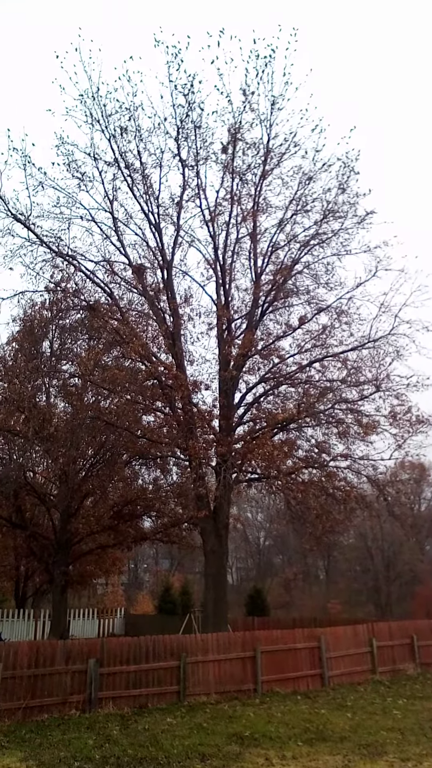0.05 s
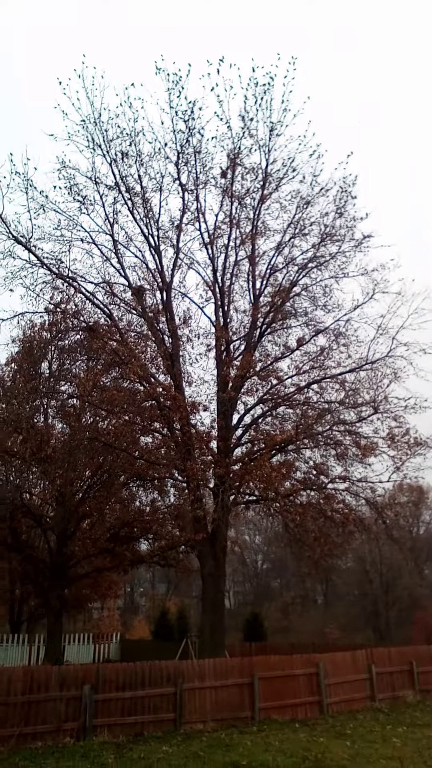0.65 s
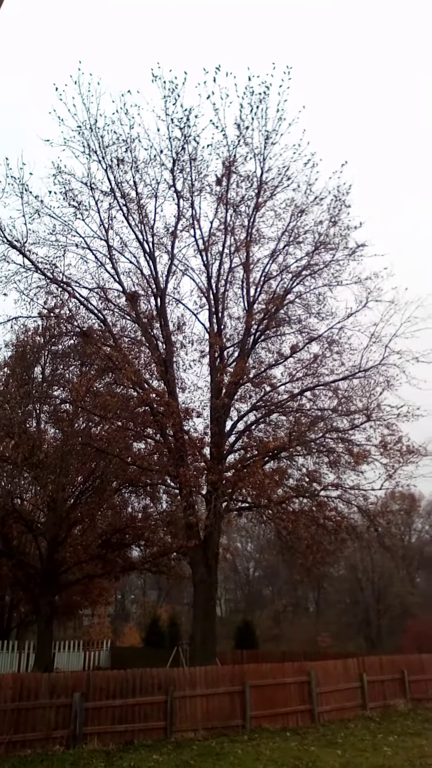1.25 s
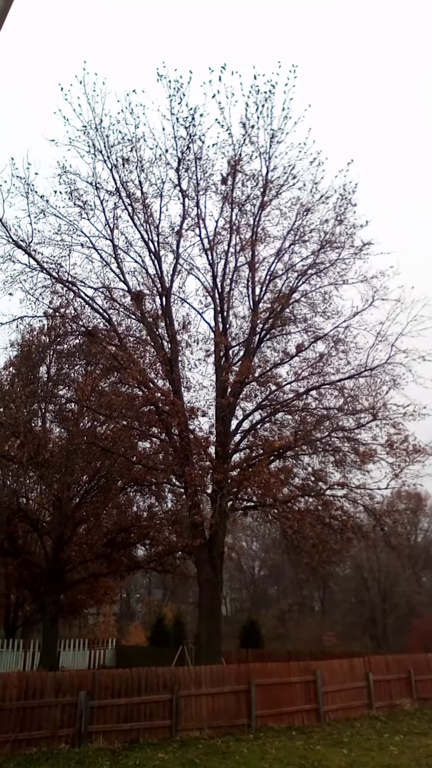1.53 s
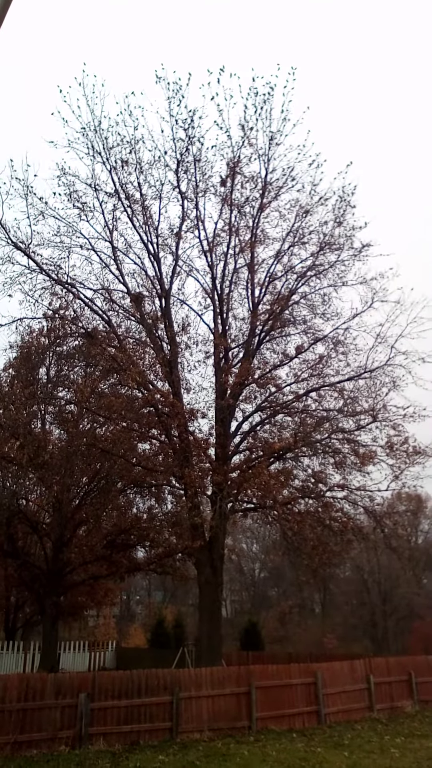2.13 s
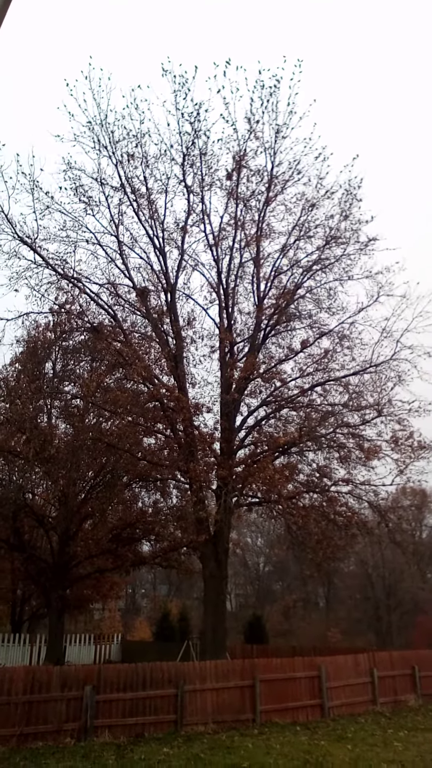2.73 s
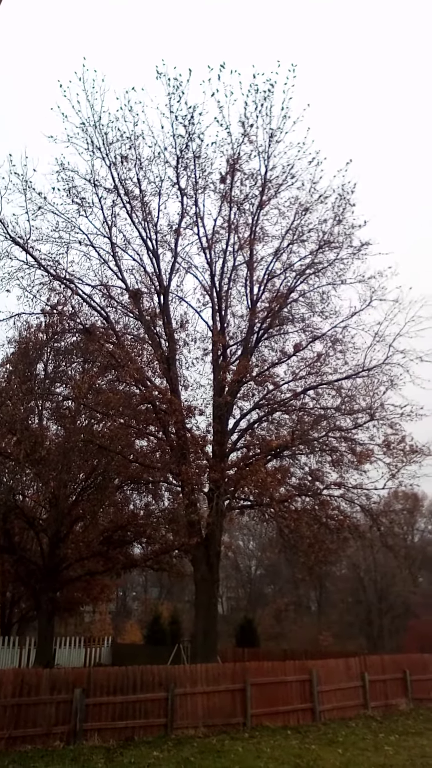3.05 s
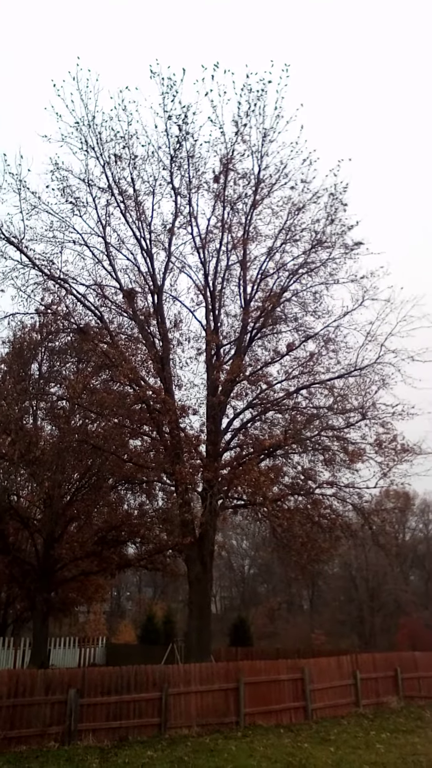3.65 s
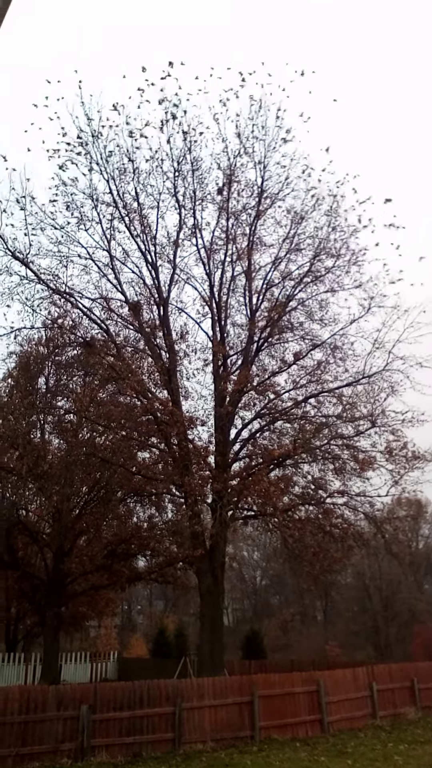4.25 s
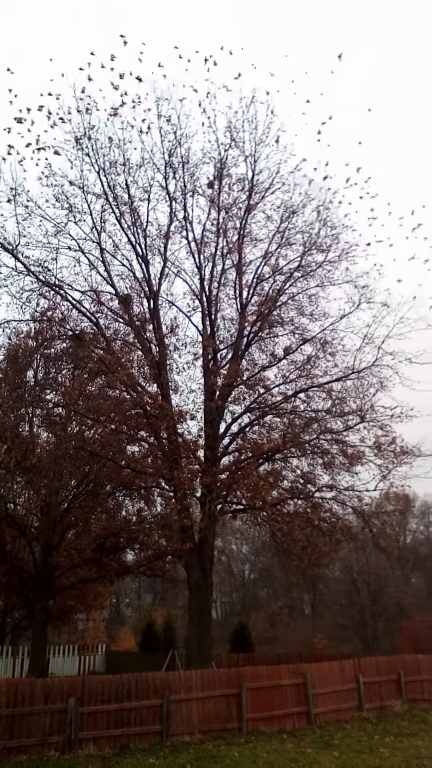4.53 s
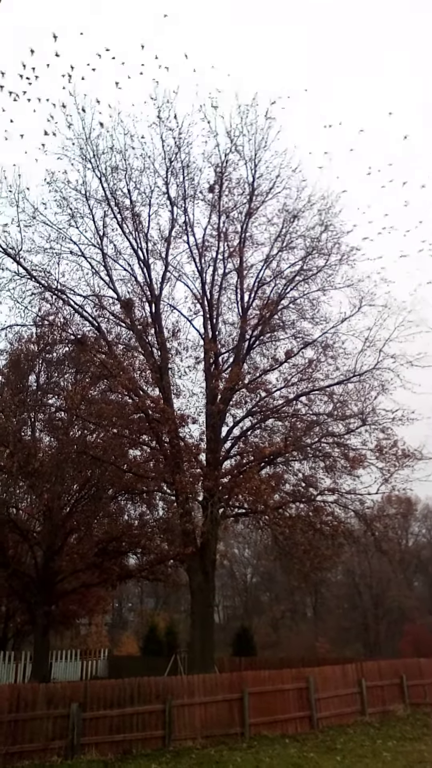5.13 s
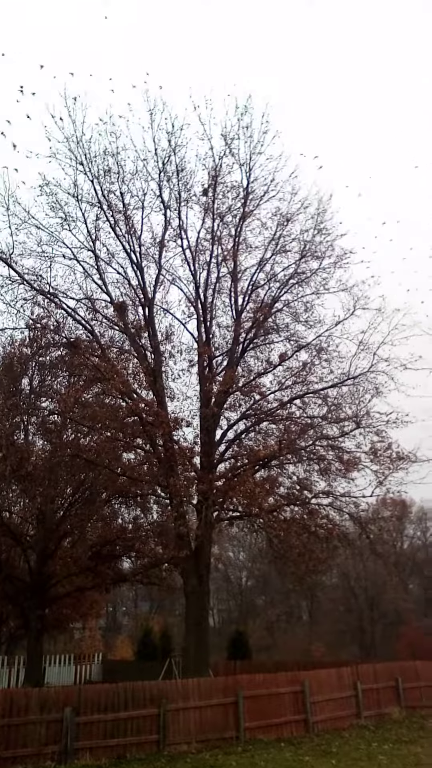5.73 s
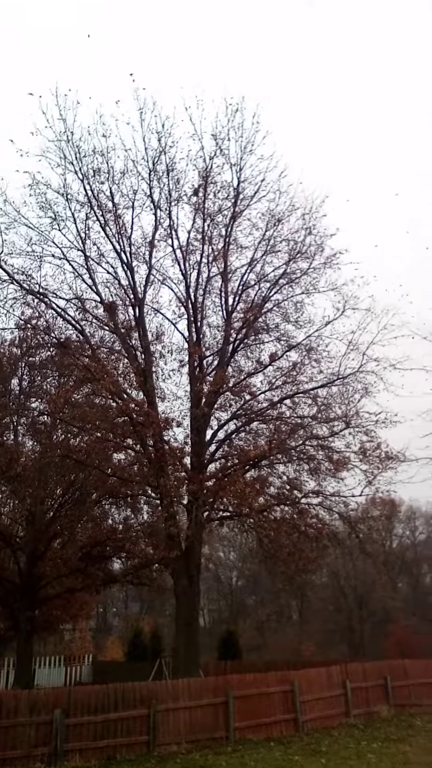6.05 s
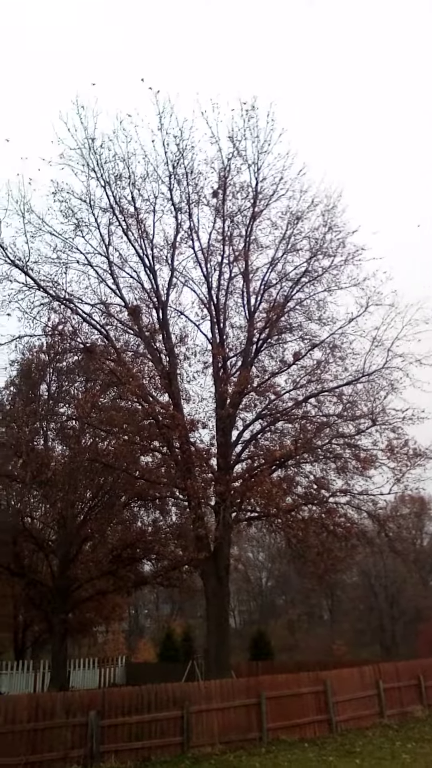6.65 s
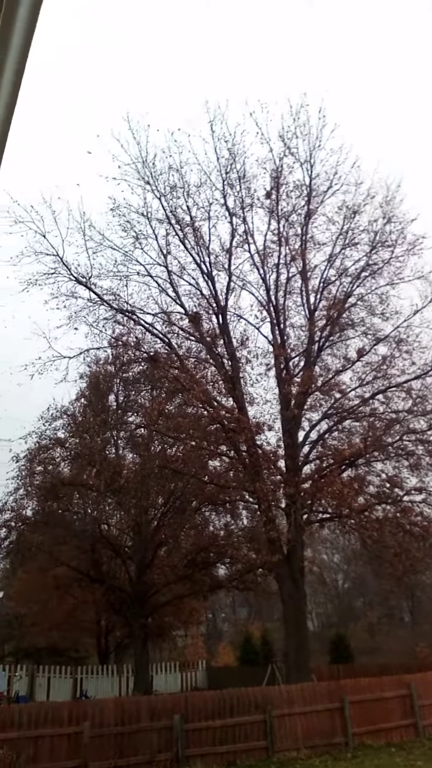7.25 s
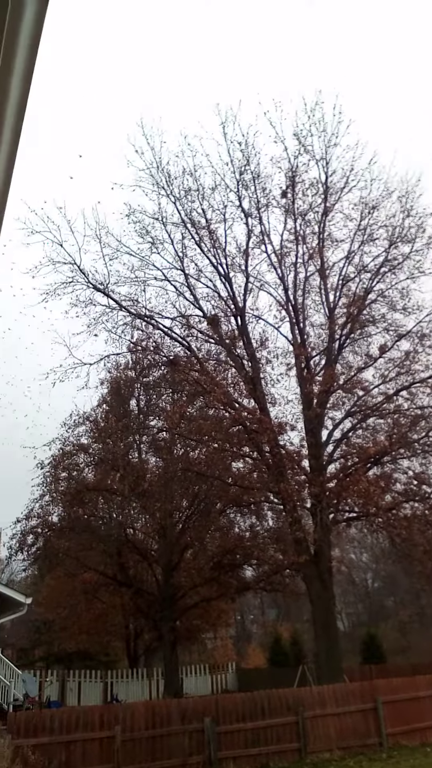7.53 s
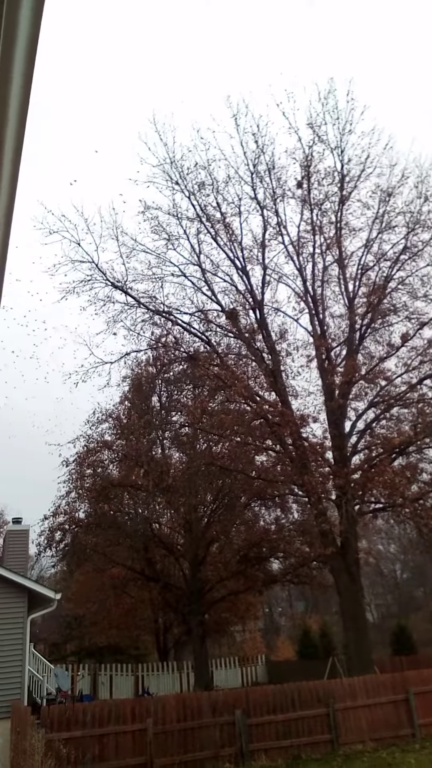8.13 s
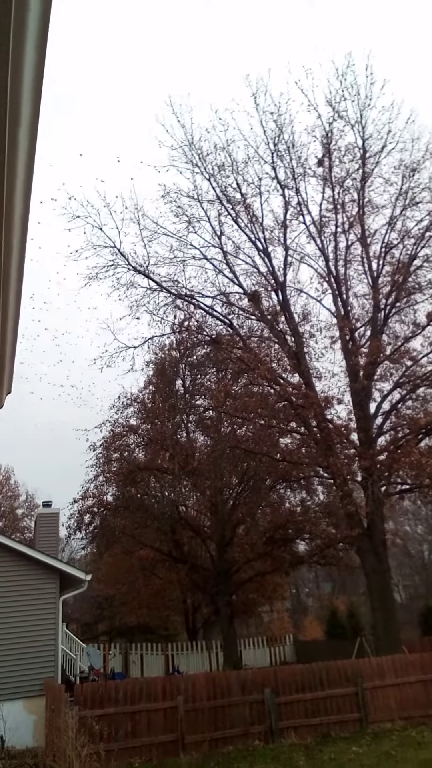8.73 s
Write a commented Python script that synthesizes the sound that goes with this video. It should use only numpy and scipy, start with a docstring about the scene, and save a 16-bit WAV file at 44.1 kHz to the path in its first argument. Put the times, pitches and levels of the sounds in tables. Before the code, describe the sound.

A flock of birds whistles, rasps and clicks outdoors, falls silent and takes off in a rush of wings, leaving one repeating a whistle.

```python
"""A garden, bare tree behind the fence: a flock of starlings whistles, rasps and clicks.
Whistles are gliding sines from a strained syrinx, rasps jittered harmonics under a throat resonance.
The birds fall silent and take off together; each downstroke puffs air, and the rush fades with distance.
A few stay: one repeats a level whistle, others chirp, tick and rasp. Trunk, fence and house wall echo.
Under it all: low outdoor rumble, distant traffic, microphone hiss."""
import sys
import numpy as np
from scipy import signal
from scipy.fft import rfft, irfft, next_fast_len
from scipy.io import wavfile
from scipy.ndimage import uniform_filter1d

SR = 44100
rng = np.random.default_rng(int(sys.argv[2]) if len(sys.argv) > 2 else 0)


def generate_wav(signal):
    """Clip the signal to [-1, 1] and save it as 16-bit WAV at the path in sys.argv[1]."""
    frames = np.transpose(np.atleast_2d(signal))
    scaled = np.clip(frames, -1, 1) * 32767
    pcm = np.round(scaled).astype(np.int16)
    wavfile.write(sys.argv[1], SR, pcm)


N = 396018
TIME = np.arange(N) / SR

# background spectra: f/Hz, gain/dB
RUMBLE_EQ = [(20, -29), (40, -10), (60, -7), (75, 6), (100, 1), (140, -10), (200, -24), (400, -51.5),
             (5000, -84)]
TRAFFIC_EQ = [(88, -13), (150, -0.5), (178, -9.5), (216, -6.5), (566, -15), (842, -12), (1300, -17),
              (1460, -18), (2820, -27), (3410, -24.5), (3650, -26), (4900, -27.5), (5820, -24), (7940, -36),
              (9270, -55), (12100, -87.5), (20400, -120)]
MIC_HISS_EQ = [(9000, -5), (13500, -11), (15000, 4.5), (16000, -12)]
# soft thumps on the rumble: t/s, level/dB
THUMPS = [(.78, -61), (1.52, -57.5), (1.77, -59), (5.4, -63), (5.7, -57.5), (5.999, -55), (6.87, -62),
          (7.3, -64), (8.84, -66)]
# ringing partials of a tick: f/centre, level/dB
TICK_PARTIALS = [(.6, -15.5), (.8, -11.5), (1, 5.5), (1.22, -4.5)]
# chorus envelope: t/s, low band/dB, middle band/dB, high band/dB
CHORUS_LEVELS = [(0.0, -49, -50, -51), (0.12, -51.5, -51.5, -52.5), (0.22, -51.5, -52.5, -65),
                 (0.36, -49, -56.5, -66), (0.46, -49.5, -53, -54.5), (0.56, -51.5, -54.5, -60),
                 (0.7, -53, -51.5, -55), (0.85, -53, -54.5, -53.5), (1.02, -53, -51.5, -61.5),
                 (1.3, -52.5, -53, -56.5), (1.43, -52, -49.5, -48.5), (1.64, -54, -50, -55),
                 (1.76, -54, -52.5, -49), (1.95, -54, -51, -59.5), (2.11, -53, -55, -54.5),
                 (2.22, -53, -55, -55), (2.36, -55.5, -52.5, -51.5), (2.5, -55, -58, -56),
                 (2.78, -57, -51.5, -61), (2.97, -58, -57, -57.5), (3.15, -61, -57, -65),
                 (3.3, -57, -58, -60), (3.44, -66, -63, -75), (3.56, -71.5, -62.5, -66),
                 (3.68, -77, -76.5, -73)]
# voice spectra: f/Hz, gain/dB
CHORUS_EQ = [(400, -45), (650, -37), (900, -10), (1300, -11), (1900, -8), (2600, -3.5), (4200, -11),
             (6600, -5.5), (7800, -7), (8800, -13.5), (9800, -32), (12000, -61), (15000, -72)]
RASP_HISS_EQ = [(3000, -34), (6500, -2), (8500, 0), (10000, -5), (12000, -12.5), (15000, -6)]
CLICK_EQ = [(700, -3), (2600, 4.5), (7000, 1), (8500, -7), (11000, -28)]
OUTER_EQ = [(7500, 1), (9500, -25.5), (14000, -16.5)]
NEAR_EQ = [(7500, -0.5), (8800, -10.5), (10000, -14.5), (11500, -12), (12600, -20), (14000, -33)]
# near chirps: t/s, length/s, start f/Hz, end f/Hz, mid bow/Hz, level/dB, flutter/pitch
CHIRPS = [ (.005, 0.074, 3920, 4680, 170, -47, 0.02), (0.069, 0.021, 4770, 3850, -130, -42, 0.011),
          (0.044, 0.038, 6690, 6210, -73, -47, 0.038), (0, 0.049, 7600, 7740, 257, -52, 0.011),
          (0.162, .06, 5980, 5520, 6, -54, 0.0073), (0.26, 0.022, 5570, 6650, 199, -56, .012),
          (0.503, 0.23, 8050, 8200, 150, -59.5, 0.013), (0.638, 0.058, 8200, 7140, 7, -56, 0.011),
          (1.305, 0.047, 4180, 3810, 100, -51, 0.1), (1.474, 0.12, 8270, 8000, -5, -56.5, 0.025),
          (0.215, 0.12, 4010, 3950, 20, -55, .004), (0.399, 0.046, 4220, 3390, 147.5, -48, 0.04),
          (0.626, 0.055, 6070, 7040, -7, -46.5, 0.011), (0.775, 0.095, 3750, 3884, 422, -45.5, 0.011),
          (0.793, 0.053, 6300, 6880, -200, -53.5, 0.0054), (0.856, 0.067, 3720, 3260, -39, -49.5, 0.015),
          (0.87, 0.1, 6800, 6240, 67, -49.5, 0.004), (0.922, 0.15, 8040, 8100, 495, -54.5, 0.023),
          (0.927, 0.097, 5250, 5900, -270, -50, 0.005), (0.992, 0.087, 6000, 6260, 122, -51.5, 0.015),
          (1.006, 0.11, 3090, 2890, -88, -57, .006), (1.111, 0.02, 3250, 5270, -78, -46.5, 0.071),
          (1.128, 0.048, 5430, 4880, -100, -50.5, 0.04), (1.222, 0.04, 3370, 3310, -100, -49.5, 0.0035),
          (1.35, 0.13, 3230, 2650, -75.5, -58.5, 0.008), (1.74, 0.04, 4900, 4550, -66, -50, 0.033),
          (1.7, 0.05, 3850, 3950, -54, -54, .02), (2.147, .03, 4500, 3940, -60, -53, .03),
          (2.167, .035, 5250, 4900, 98, -53, .04), (2.218, 0.053, 6120, 6200, 1, -49, 0.012),
          (3.039, .045, 4550, 3790, -58, -58.5, .03), (1.828, 0.12, 6470, 6580, 139, -42.5, 0.0052),
          (1.885, 0.07, 6380, 5430, -82.5, -47, 0.04), (2.009, 0.058, 6220, 4870, 116, -46.5, 0.2),
          (2.211, 0.17, 2366, 2287, 98, -57, 0.035), (2.389, 0.17, 2595, 2110, -18.5, -55.5, 0.018),
          (2.312, 0.065, 9300, 9230, 7, -54, 0.007), (2.453, 0.093, 8430, 7200, -440, -53.5, 0.038),
          (2.545, 0.12, 6200, 6920, 194, -52, 0.058), (2.692, 0.22, 6870, 6380, -45.5, -52.5, 0.037),
          (2.75, 0.11, 8020, 7920, -350, -52, 0.0082), (2.934, 0.1, 4720, 4110, 57, -53.5, .008),
          (3.101, 0.11, 3470, 2680, -110, -57.5, 0.015), (3.125, 0.14, 8740, 8700, -2, -56, 0.0077),
          (3.243, 0.11, 8860, 8570, -4, -51, 0.0073), (3.459, 0.05, 2674, 3550, -180, -58.5, 0.029),
          (3.498, 0.06, 3585, 3620, 60, -59.5, 0.02), (3.467, 0.065, 8400, 7650, -80, -55.5, 0.02),
          (3.519, 0.043, 7250, 8040, 148, -53, 0.018), (3.558, 0.066, 7800, 7720, 104, -52, 0.0088),
          (3.615, 0.045, 7750, 7110, 248, -54.5, 0.017), (3.808, 0.065, 7560, 7900, -220, -63.5, 0.03),
          (3.834, 0.033, 4660, 4620, 7, -59, 0.026), (4.784, 0.49, 4110, 4040, 59, -74, .06),
          (7.253, 0.05, 6240, 5690, 4, -55, 0.01), (7.279, 0.021, 5500, 4860, 3, -58.5, 0.017),
          (7.957, 0.15, 5770, 5550, 14, -75.5, 0.019), (7.97, 0.076, 5420, 5340, 2, -74, .05),
          (8.281, 0.093, 6620, 6550, -28, -80, .006), (8.834, .07, 6100, 6000, 2, -77, 0.013),
          (8.92, 0.065, 6750, 6720, -3, -69.5, 0.0071), (8.158, 0.25, 2630, 2690, -100, -82, 0.024),
          (8.287, .12, 3173, 2890, 237, -69, .012), (8.51, 0.067, 5600, 5520, 76, -75, 0.047),
          (8.653, 0.046, 4400, 6200, -190, -68.5, 0.12)]
# near rasps: t/s, length/s, f/Hz, throat resonance/Hz, level/dB, low-harmonic weight
RASPS = [(0.393, 0.069, 1080, 6350, -52, 0.33), (0.586, 0.056, 978, 5070, -52, 0.28),
         (0.717, 0.068, 1140, 5350, -48, 0.76), (1.352, 0.17, 1051, 6140, -55.5, 0.52),
         (1.673, 0.12, 970, 4440, -53, 0.4), (2.138, 0.078, 1064, 4970, -55, 0.3),
         (2.662, 0.1, 876, 5000, -55, 0.83), (3.042, 0.073, 926, 4400, -52.5, 0.63),
         (6.902, .17, 969, 5820, -61.5, 0.52), (7.0, 0.11, 1020, 6100, -61.5, 0.58),
         (7.222, 0.074, 1152, 6600, -67, 0.43), (8.86, 0.11, 871, 5870, -60.5, 0.56)]
# loud falling cries, one curve each: t/s, f/Hz, level/dB, buzz/0-1
SWOOPS = [
    [(1.45, 7800, -51, 0), (1.485, 7300, -47, 0), (1.5, 6990, -43.5, 0), (1.535, 6840, -46, .2),
     (1.547, 6600, -36.5, 0.55), (1.575, 6200, -41.5, 1), (1.6, 5700, -45, 0.8)],
    [(2.17, 7700, -57, 0.1), (2.22, 7100, -48, 0), (2.26, 6820, -42, 0.3), (2.285, 6550, -35, 0.1),
     (2.31, 6000, -37.5, 1), (2.335, 5500, -45, .7)],
    [(3.16, 7760, -68, 0.1), (3.19, 7550, -50.5, 0.2), (3.21, 7050, -40.5, 0.5), (3.25, 5840, -39.5, .9),
     (3.28, 5260, -44.5, 0.9), (3.32, 4420, -49, 0.5)],
]
# near ticks: t/s, level/dB, centre f/Hz, decay/s, click re ring before trim/dB
TICKS = [(3.492, -53, 6500, 0.0047, 10), (5.733, -65, 6460, 0.021, 11), (5.784, -52, 5750, 0.0058, -6),
         (5.788, -61.5, 7600, 0.0087, -20), (6.091, -65.5, 6120, 0.011, 0), (6.371, -55.5, 6000, 0.011, 2),
         (6.721, -52.5, 5840, 0.0053, -10), (6.815, -55.5, 4900, 0.0077, 6),
         (7.14, -53.5, 5170, 0.0073, -13), (7.953, -67.5, 3180, .008, -9), (8.189, -65.5, 6550, 0.021, 0),
         (6.52, -60, 6070, .0025, -2), (7.384, -59, 5930, .0015, -3), (8.777, -68, 6660, .004, -4)]
# birds shifting perch, soft wing flutter: start t/s, length/s, level/dB
PERCH_SHIFTS = [(2.355, 0.27, -66.5), (3.532, 0.95, -69.5)]
# wing noise spectrum: f/Hz, gain/dB
WING_EQ = [(24, -26), (40, -8.5), (76, -12), (168, -11), (304, -1), (490, -20.5), (690, -14), (810, -12),
           (1400, -12), (2210, -28.5), (2830, -28.5), (3400, -22.5), (3730, -25), (6290, -20.5),
           (9270, -47), (12100, -60), (15000, -52), (20400, -120)]
# air moved at take-off: t/s, low push/dB, whoosh/dB
WING_AIR_LEVELS = [(3.6, -95, -90), (3.73, -63, -76), (3.82, -64.5, -65), (3.96, -63, -53),
                   (4.03, -50, -53), (4.2, -53, -52.5), (4.34, -54, -54), (4.47, -51.5, -58),
                   (4.57, -46.5, -52), (4.67, -60, -61.5), (4.74, -49.5, -61.5), (4.86, -68, -67.5),
                   (4.916, -52, -64), (4.964, -67, -73), (5.02, -56, -62), (5.1, -65, -70.5),
                   (5.15, -59, -63), (5.2, -54.5, -70), (5.27, -72, -74), (5.6, -70, -78)]
# lone bird's whistles: t/s, length/s, f/Hz, final fall/pitch, level/dB, octave overtone/dB
LONE_NOTES = [(4.2, 0.2, 3360, 0.036, -74, -28), (4.581, .19, 3420, 0.07, -70.5, -30),
              (4.78, .3, 3350, 0.05, -77, -30), (6.388, 0.32, 3490, 0.11, -64.5, -26),
              (8.108, 0.28, 3450, 0.11, -72.5, -16), (8.278, .33, 3610, 0.17, -70, -20),
              (8.812, 0.23, 3540, 0.14, -65.5, -22)]


def amp(db):
    """dB to gain."""
    return 10 ** (np.asarray(db) / 20)


def unit(x):
    """Scale to rms 1."""
    return x / np.sqrt(np.mean(x ** 2) + 1e-20)


def add(mix, t_s, sound):
    """Mix in at t_s."""
    at = round(t_s * SR)
    sound = sound[max(-at, 0):]
    part = mix[max(at, 0):][:len(sound)]
    part += sound[:len(part)]


def eq(x, points):
    """Filter by a curve of f/Hz, gain/dB."""
    hz, db = np.transpose(points)
    size = next_fast_len(len(x))
    bins_hz = np.fft.rfftfreq(size, 1 / SR)
    gain = amp(np.interp(np.log(bins_hz + 1), np.log(hz), db))
    return irfft(rfft(x, size) * gain, size)[:len(x)]


def band(x, lo_hz, hi_hz):
    """Butterworth band-pass."""
    return signal.sosfilt(signal.butter(3, [lo_hz, hi_hz], "band", fs=SR, output="sos"), x)


def envelope(rows, column, fade_db_per_s=108):
    """Gain from one dB column; fades past the last row."""
    rows = np.array(rows)
    after_s = np.maximum(TIME - rows[-1, 0], 0)
    return amp(np.interp(TIME, rows[:, 0], rows[:, column]) - fade_db_per_s * after_s)


def wobble(size, rate_hz):
    """Smooth random curve, about unit size."""
    knots = rng.standard_normal(640)
    return np.interp(np.arange(size) * (rate_hz / SR), np.arange(len(knots)), knots)


def steady(x, span_s):
    """Hold the running rms at 1."""
    return x / np.sqrt(abs(uniform_filter1d(x ** 2, int(span_s * SR))) + 1e-12)


def garden(x, wet_db, t60_s):
    """Early echoes off trunk, fence and wall; short tail off the branches."""
    t = np.arange(SR) / SR
    taps = rng.choice([-1., 1.], SR) * (rng.random(SR) < 2500 / SR) * (t > .003)
    tail = taps * (amp(-60 * t / t60_s) + 0.73 * np.exp(-t / 0.011))
    echoes = signal.oaconvolve(x, tail / np.linalg.norm(tail))[:N]
    return (x + amp(wet_db) * echoes) / np.hypot(1, amp(wet_db))


def outdoors(rumble_db=-66.5, lumps_db=4.8, lumps_hz=11, thump_s=0.046, traffic_db=-71, hiss_db=-95):
    """Lumpy rumble, distant traffic wash, microphone hiss."""
    low, wash, hiss = rng.standard_normal((3, N))
    thumps = sum(amp(db) * np.exp(-((TIME - t_s) / thump_s) ** 2) for t_s, db in THUMPS)
    lumps = amp(rumble_db + lumps_db * wobble(N, lumps_hz))
    rumble = np.hypot(lumps, thumps) * steady(eq(low, RUMBLE_EQ), .15)
    traffic = amp(traffic_db + 1.2 * wobble(N, 3)) * unit(eq(wash, TRAFFIC_EQ))
    return rumble + traffic + amp(hiss_db) * unit(band(eq(hiss, MIC_HISS_EQ), 9000, 16000))


def whistle(length_s, start_hz, mid_hz, end_hz, flutter, overtone_db, attack_s=0.013, release_share=0.32):
    """Near-sine on an arched glide; the strained syrinx flutters and increasingly buzzes."""
    u = np.linspace(0, 1, int(length_s * SR))
    arch_hz = mid_hz - (start_hz + end_hz) / 2
    hz = start_hz + (end_hz - start_hz) * u + arch_hz * (1 - (2 * u - 1) ** 2)
    buzz_hz = 190 * rng.uniform(0.797, 1.25)
    buzz = np.minimum(2 * u, 1) * np.sin(2 * np.pi * buzz_hz * length_s * u)
    waver = flutter * (wobble(len(u), 1295) + 0.35 * buzz) + 0.003 * wobble(len(u), 34.5)
    phase = 2 * np.pi * np.cumsum(hz * (1 + waver)) / SR
    tone = np.sin(phase) + amp(overtone_db) * np.sin(2 * phase)
    shake_db = np.tanh(flutter / 0.013) * (4.5 * wobble(len(u), 170) + 4 * buzz)
    gate = np.minimum(u * length_s / attack_s, 1) * np.minimum((1 - u) / release_share, 1)
    return unit(tone * amp(shake_db) * gate)


def rasp(length_s, start_hz, end_hz, throat_hz, jitter=0.082, bend=0.0299, width_oct=0.47, low_weight=1):
    """Bent, jittered harmonics under one throat resonance; each flickers on its own."""
    size = int(length_s * SR)
    waver = jitter * wobble(size, 1500) + bend * wobble(size, 68.54)
    phase = 2 * np.pi * np.cumsum(np.linspace(start_hz, end_hz, size) * (1 + waver)) / SR
    orders = np.arange(2, 9)
    ratio = orders * start_hz / throat_hz
    weights = np.exp(-(np.log2(ratio) / width_oct) ** 2) + low_weight * ratio * (ratio < 1)
    harmonics = np.sin(orders[:, None] * phase) * amp([6 * wobble(size, 40) for _ in orders])
    return unit(weights @ harmonics * amp(3 * wobble(size, 300)) * signal.windows.tukey(size, .7))


def tick(centre_hz, decay_s, click_db, width_hz=170, click_trim_db=-5, attack_s=0.00038):
    """Sudden chip: briefly ringing partials plus a dry click."""
    t = np.arange(2048) / SR
    noise = rng.standard_normal(len(t))
    radius = np.exp(-np.pi * width_hz / SR)
    ring = np.zeros(len(t))
    for ratio, db in TICK_PARTIALS:
        feedback = [1, -2 * radius * np.cos(2 * np.pi * centre_hz * ratio / SR), radius ** 2]
        ring += amp(db) * unit(signal.lfilter([1, 0, -1], feedback, noise))
    click = amp(click_db + click_trim_db) * unit(eq(noise, CLICK_EQ))
    return unit(unit(ring) + click) * np.exp(-t / decay_s) * (1 - np.exp(-t / attack_s))


def chorus(count=1100, spread_db=1.27):
    """Hundreds of independent whistles (mostly falling), rasps and ticks."""
    crown = np.zeros((4, N))  # four parts, each with its own echoes
    for k, (when, kind, pitch, span, glide, arch, rough, near) in enumerate(rng.random((count, 8))):
        hz = 900 * (7400 / 900) ** (pitch ** .65)
        if kind < .52:
            flutter = 0.006 + 0.03 * rough ** 2 + .08 * (1 - pitch) ** 8  # lowest voices are hoarse
            fall = .25 * (glide - .3) * (0.393 + span)
            path_hz = hz * (1 + fall / 2), hz * (1 + .14 * (arch - .5)), hz * (1 - fall / 2)
            sound = whistle(0.03 + .13 * span ** 2, *path_hz, flutter, overtone_db=-6)
        elif kind < .82:
            start_hz = 650 + 500 * arch
            end_hz = start_hz * (1.1 - .3 * glide)
            sound = amp(-0.5) * rasp(0.0282 + .09 * span, start_hz, end_hz, throat_hz=max(hz, 2200))
        else:
            sound = amp(5) * tick(2500 + 5000 * pitch, decay_s=0.00085 + 0.0015 * span, click_db=-1.2)
        near_db = spread_db * min(-np.log(1 - near), 2.5)
        add(crown[k % len(crown)], 4.3 * when - .3, amp(near_db) * sound)
    voices = eq(sum(garden(part, wet_db=-1.5, t60_s=1) for part in crown), CHORUS_EQ)
    low = steady(band(voices, 500, 3500), .15) * envelope(CHORUS_LEVELS, column=1)
    middle = steady(band(voices, 3700, 5500), .1) * envelope(CHORUS_LEVELS, column=2)
    high = steady(band(voices, 5900, 14000), .1) * envelope(CHORUS_LEVELS, column=3)
    return amp(-1.6) * low + amp(0.2) * middle + amp(-1.2) * high


def outer_birds(count=100, until_s=3.15, trim_db=-8):
    """Short arched chirps from the outer twigs, clear above the chorus."""
    chirps = np.zeros(N)
    for when, pitch, span, glide, arch in rng.random((count, 5)):
        hz = 1500 * (7800 / 1500) ** (pitch ** .75)
        drop = 0.078 * (glide - .4)
        path_hz = hz * (1 + drop), hz * (1 + 0.1184 * (arch - .4)), hz * (1 - drop)
        note = whistle(.02 + .06 * span, *path_hz, flutter=0.016, overtone_db=-24, attack_s=.005)
        add(chirps, until_s * when, amp(4 * pitch) * note)
    chirps = garden(eq(chirps, OUTER_EQ), wet_db=-0.5, t60_s=0.9)
    return amp(trim_db) * chirps * envelope(CHORUS_LEVELS, column=1)


def near_birds():
    """Single chirps, cries, rasps and ticks that stand out from the tree."""
    chirps, cries, rasps, ticks = np.zeros((4, N))
    for t_s, length_s, start_hz, end_hz, bow_hz, db, flutter in CHIRPS:
        path_hz = start_hz, (start_hz + end_hz) / 2 + bow_hz, end_hz
        note = whistle(length_s, *path_hz, flutter, overtone_db=-40, attack_s=0.01, release_share=0.18)
        add(chirps, t_s, amp(db) * note)
    for curve in SWOOPS:
        add(cries, curve[0][0], swoop(curve))
    for t_s, length_s, hz, throat_hz, db, low_weight in RASPS:
        voice = rasp(length_s, hz, 0.9 * hz, throat_hz, jitter=0.0573, bend=0.0273,
                     width_oct=0.22, low_weight=low_weight)
        add(rasps, t_s, amp(db) * (voice + amp(-19) * rasp_hiss(length_s)))
    for t_s, db, centre_hz, decay_s, click_db in TICKS:
        add(ticks, t_s, amp(db) * tick(centre_hz, decay_s, click_db, width_hz=270))
    calls = (garden(chirps, wet_db=-3, t60_s=0.4) + garden(cries, wet_db=-2.5, t60_s=0.4)
             + garden(rasps, wet_db=-3, t60_s=0.37) + garden(ticks, wet_db=-2, t60_s=0.24))
    return eq(calls, NEAR_EQ)  # air and microphone dull the top


def rasp_hiss(length_s, rattle_hz=210, rattle_db=4):
    """Air forced through a near rasp: bright, rattling edge."""
    size = int(length_s * SR)
    hiss = eq(rng.standard_normal(size), RASP_HISS_EQ)
    return unit(hiss * amp(rattle_db * wobble(size, rattle_hz)) * signal.windows.tukey(size, .7))


def swoop(curve, buzz_hz=152.2, warble=0.052, flutter=.01, chop_db=7, edge_s=.006):
    """Pure falling cry that strains and breaks into warbled pulses."""
    curve = np.array(curve)
    t = np.arange(curve[0, 0], curve[-1, 0], 1 / SR)
    hz, db, buzz = (np.interp(t, curve[:, 0], column) for column in curve.T[1:])
    buzz_phase = 2 * np.pi * np.cumsum(buzz_hz * (1 + .1 * wobble(len(t), 100))) / SR
    waver = flutter * wobble(len(t), 890) + warble * buzz * np.cos(buzz_phase)
    phase = 2 * np.pi * np.cumsum(hz * (1 + waver)) / SR
    tone = np.sin(phase) + amp(-29) * buzz * np.sin(2 * phase)
    pulses = amp(chop_db * buzz * (np.sin(buzz_phase) - .5))
    gate = np.minimum(np.minimum(t - t[0], t[-1] - t) / edge_s, 1)
    return np.sqrt(2) * amp(db) * tone * pulses * gate


def wingbeats(count, sharpness=5):
    """Each bird chops the air at its own rate; one noise puff per downstroke."""
    t = TIME[::64]
    power = np.zeros(len(t))
    for near, pace, phase in rng.random((count, 3)):
        beat_hz = 12 * (0.64 + .4 * pace)
        power += amp(3.1 * near) * np.exp(sharpness * np.cos(2 * np.pi * (beat_hz * t + phase)))
    return unit(np.sqrt(np.interp(TIME, t, power)) * rng.standard_normal(N))


def perch_shifts():
    """Soft wing noise of a few restless birds."""
    wings = unit(band(wingbeats(count=9), 303, 454))
    return wings * sum(amp(db) * np.exp(-(2 * (TIME - start_s) / length_s - 1) ** 2)
                       for start_s, length_s, db in PERCH_SHIFTS)


def take_off():
    """Feather swish peaks at the leap; whoosh and low push surge as groups let go."""
    wings = eq(wingbeats(count=48), WING_EQ)
    push = steady(band(wings, 56.5, 149.5), 0.08) * envelope(WING_AIR_LEVELS, column=1)
    whoosh = steady(band(wings, 159, 413), 0.15) * envelope(WING_AIR_LEVELS, column=2)
    whirr = unit(band(wings, 620, 1940)) * departure(db=-59.5, hold_s=0.27, fade_db_per_s=23.5)
    swish = unit(band(wings, 2210, 18000)) * departure(db=-56, hold_s=0.23, fade_db_per_s=15.5)
    flaps = near_wings() * departure(db=-50, hold_s=0.25, fade_db_per_s=30.5)
    return amp(0.5) * push + amp(-1.5) * whoosh + whirr + swish + flaps


def departure(db, hold_s, fade_db_per_s, aloft_s=4.08, leap_s=.3):
    """Wing gain: swells with the leap, holds, fades with distance."""
    early_s = np.maximum(aloft_s - TIME, 0)
    late_s = np.maximum(TIME - aloft_s - hold_s, 0)
    return amp(db - 20 * np.minimum(early_s / leap_s, 10) ** 2 - fade_db_per_s * late_s)


def near_wings(count=16, start_s=3.78, strokes=14, stroke_s=.012, spread_db=4):
    """Nearest birds: one distinct flap per downstroke, pitched by wing size."""
    t = np.arange(4096) / SR
    stroke = t / stroke_s * np.exp(-2 * t / stroke_s)
    flaps = np.zeros(N)
    for smallness, (when, pace, far) in zip(np.linspace(0, 1, count), rng.random((count, 3))):
        hz = 200 * (1600 / 200) ** smallness
        beat_hz = 13 * (.8 + .4 * pace)
        gain = amp(-spread_db * far - 10 * smallness)
        puffs = band(rng.standard_normal((strokes, len(t))), hz / 1.15, hz * 1.15)
        for k, puff in enumerate(puffs):
            add(flaps, start_s + .2 * when + k / beat_hz, gain * unit(puff * stroke))
    return garden(flaps, wet_db=-4, t60_s=.4) / np.sqrt(count)


def lone_caller(scoop=0.13, scoop_s=0.016, flutter=0.0034, attack_s=0.034, hold_share=0.73, fade_db=22):
    """One farther bird repeats a pure whistle: slides up, holds, sags and fades."""
    notes = np.zeros(N)
    for t_s, length_s, hz, fall, db, overtone_db in LONE_NOTES:
        t = np.arange(0, length_s, 1 / SR)
        u = t / length_s
        glide_hz = hz * (1 - scoop * np.exp(-t / scoop_s)) * (1 - fall * u ** 2)
        phase = 2 * np.pi * np.cumsum(glide_hz * (1 + flutter * wobble(len(t), 60))) / SR
        tone = np.sin(phase) + amp(overtone_db) * np.sin(2 * phase)
        shimmer_db = 2.5 * wobble(len(t), 30)
        tail_db = -fade_db * np.maximum(u - hold_share, 0) / (1 - hold_share)
        gate = np.minimum(t / attack_s, 1) * signal.windows.tukey(len(t), .1)
        add(notes, t_s, amp(db) * unit(tone * gate * amp(shimmer_db + tail_db)))
    return garden(notes, wet_db=-5, t60_s=0.5)


def far_wings(db=-80, peak_s=6.48, span_s=.6):
    """Faint swish of the flock wheeling away."""
    swell = amp(db) * np.exp(-((TIME - peak_s) / span_s) ** 2)
    return swell * unit(band(wingbeats(count=30), 3500, 6950))


def scene():
    """Voices, wings and background; mono."""
    voices = chorus() + outer_birds() + near_birds() + lone_caller()
    wings = take_off() + far_wings() + perch_shifts()
    return (voices + wings + outdoors())[None]


def record(dry):
    """Band limit: low-pass at 15750 Hz."""
    lowpass = signal.firwin(511, 15750, window=("kaiser", 9), fs=SR)
    return signal.oaconvolve(dry, lowpass[None], "same")


dry = scene()
out = record(dry)
generate_wav(out)
```